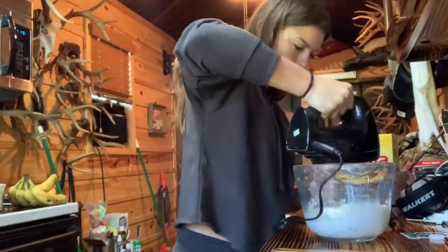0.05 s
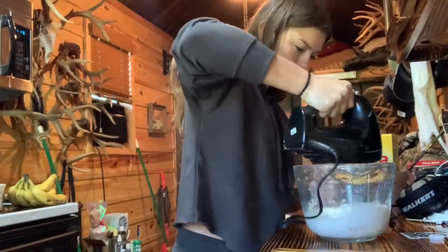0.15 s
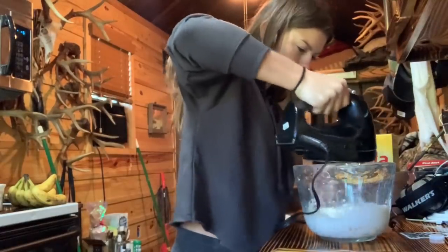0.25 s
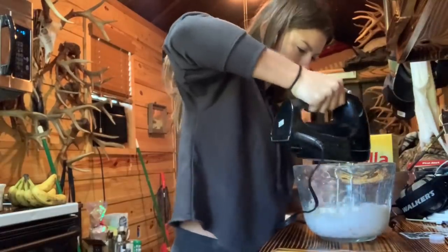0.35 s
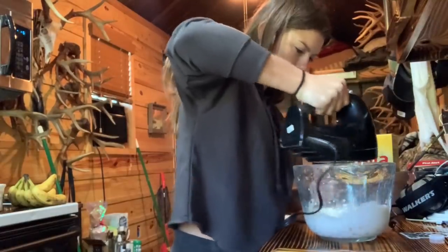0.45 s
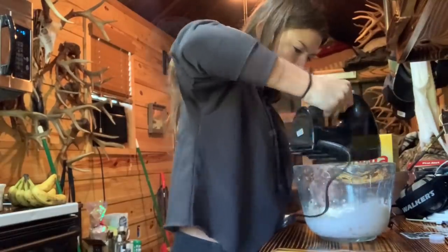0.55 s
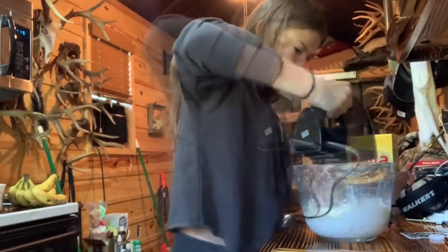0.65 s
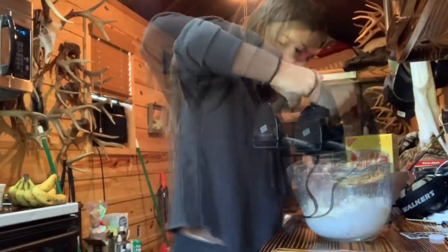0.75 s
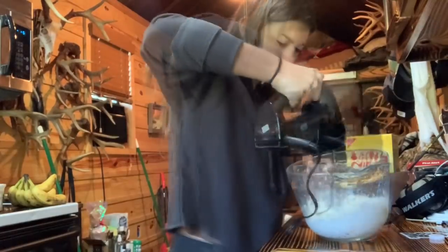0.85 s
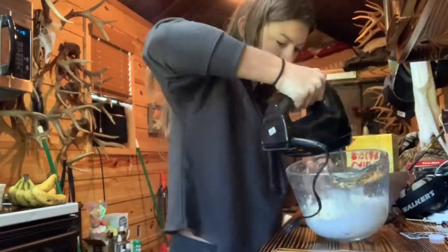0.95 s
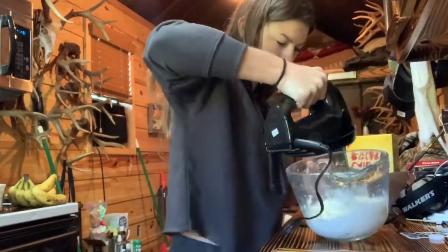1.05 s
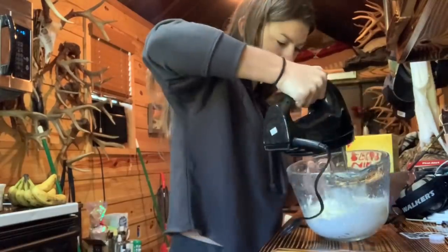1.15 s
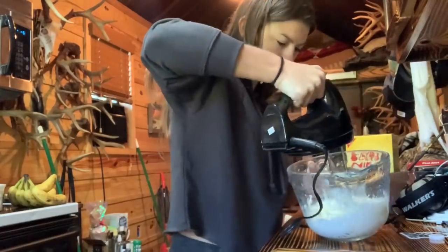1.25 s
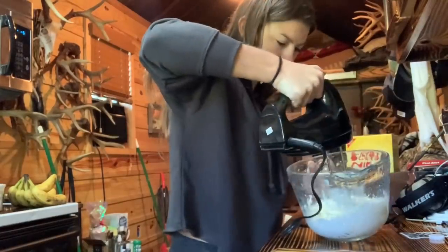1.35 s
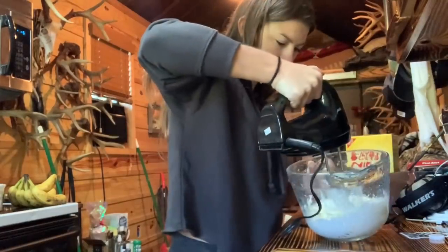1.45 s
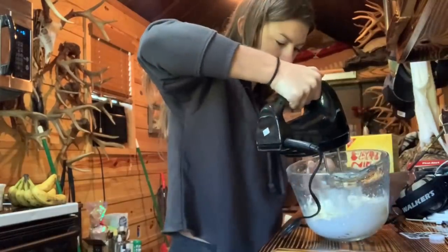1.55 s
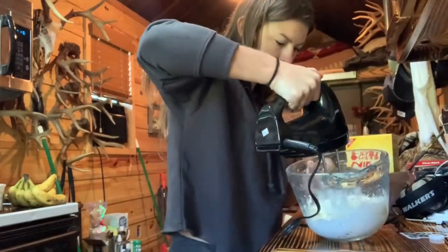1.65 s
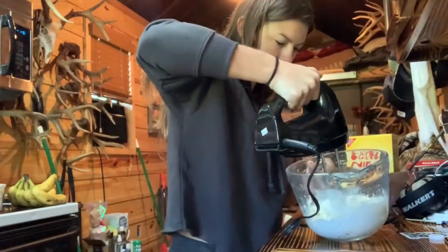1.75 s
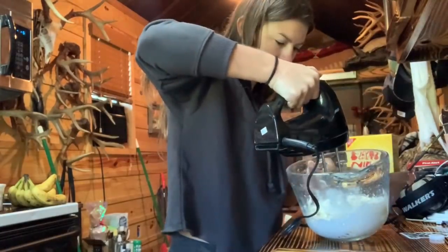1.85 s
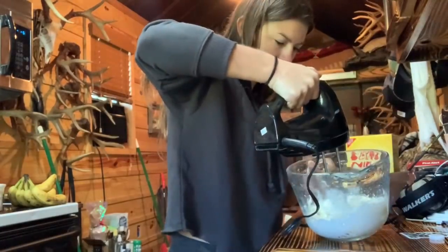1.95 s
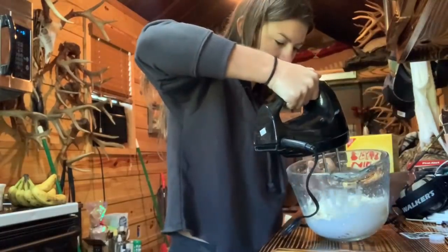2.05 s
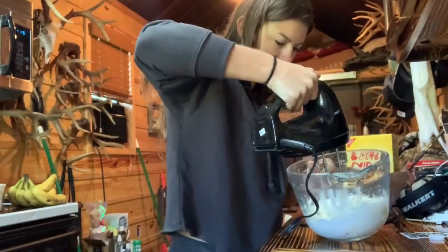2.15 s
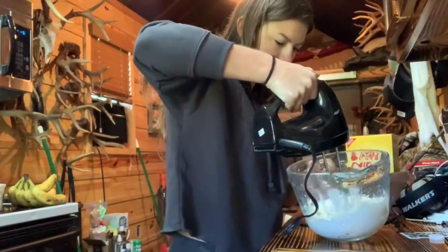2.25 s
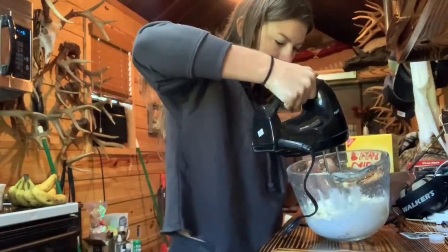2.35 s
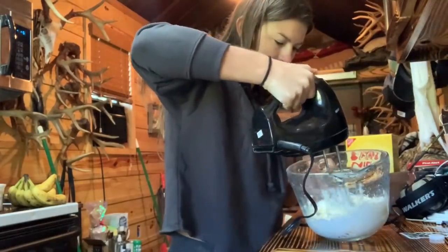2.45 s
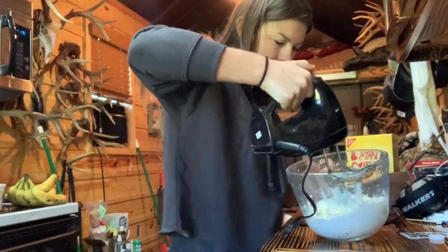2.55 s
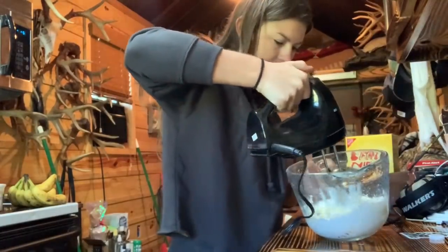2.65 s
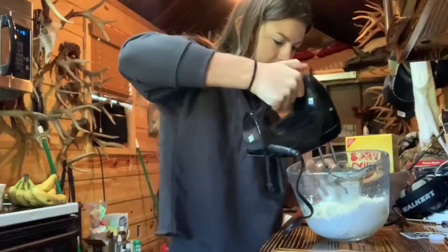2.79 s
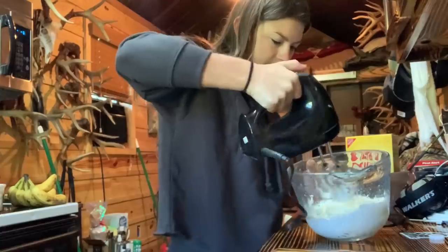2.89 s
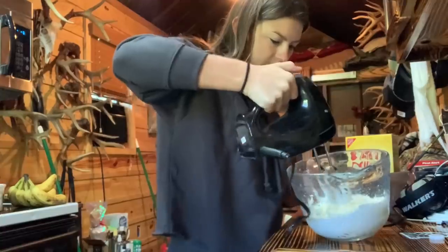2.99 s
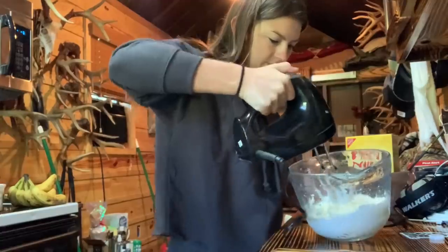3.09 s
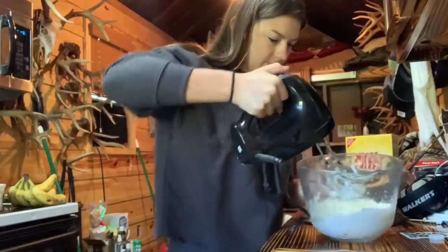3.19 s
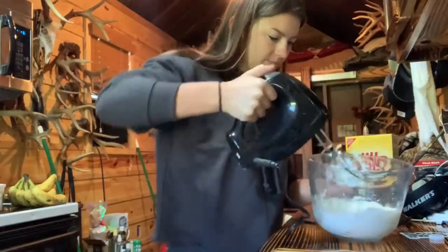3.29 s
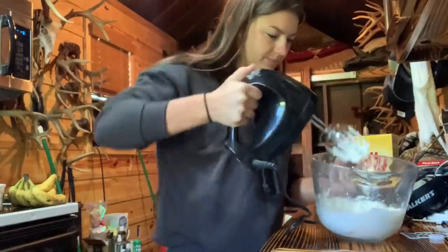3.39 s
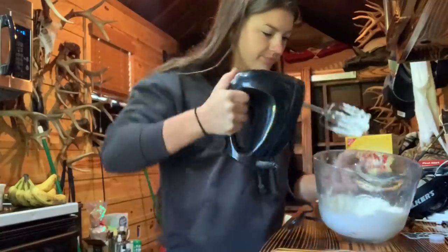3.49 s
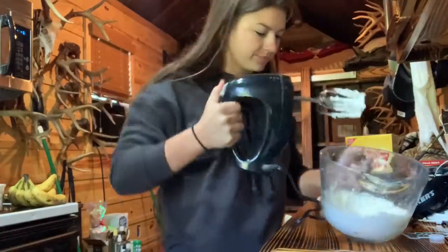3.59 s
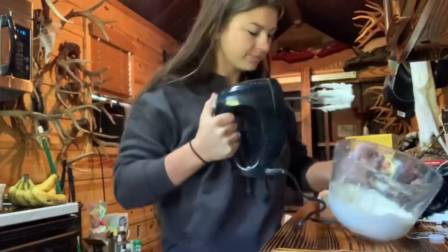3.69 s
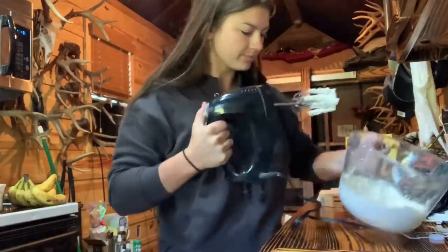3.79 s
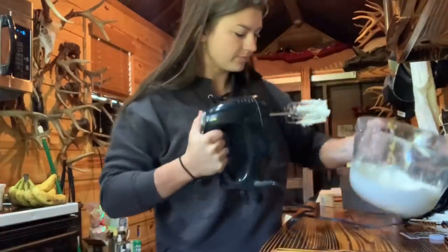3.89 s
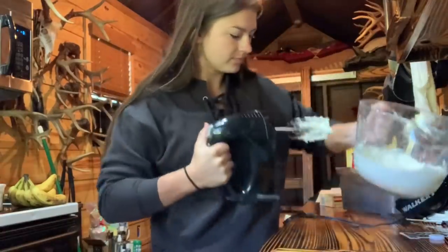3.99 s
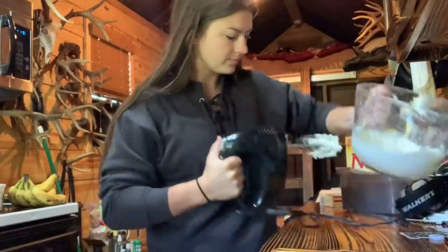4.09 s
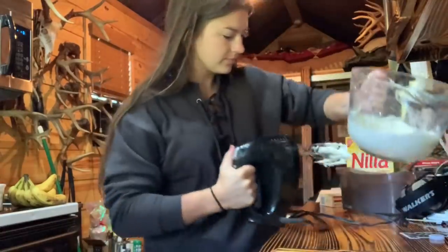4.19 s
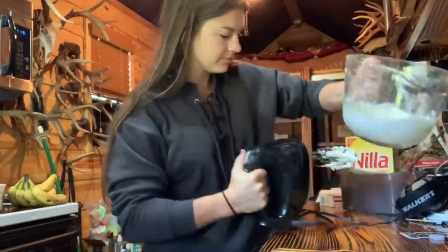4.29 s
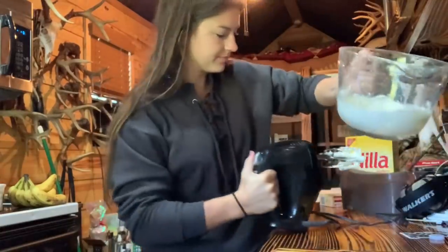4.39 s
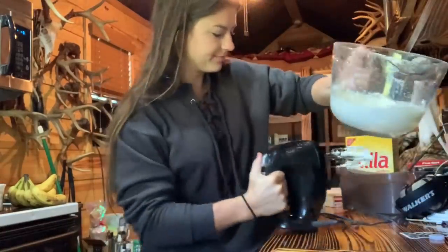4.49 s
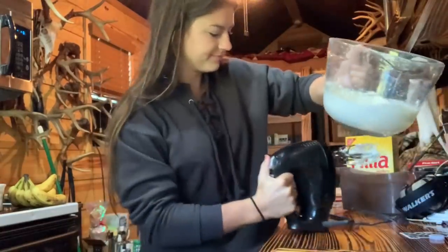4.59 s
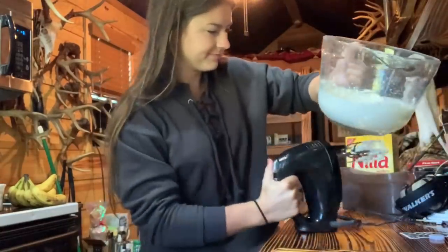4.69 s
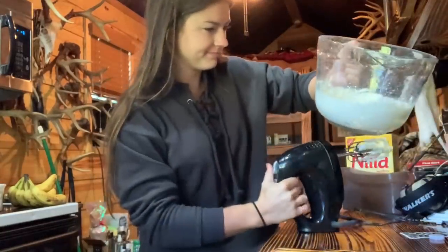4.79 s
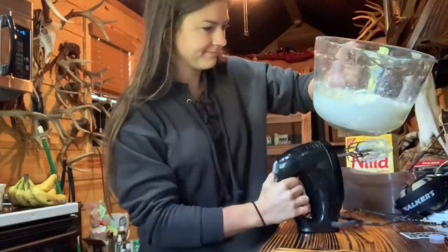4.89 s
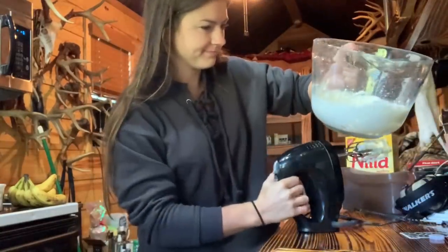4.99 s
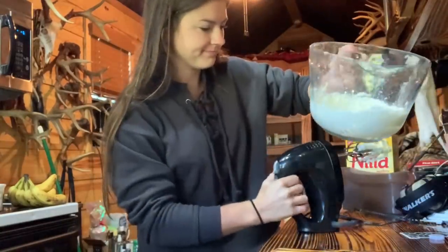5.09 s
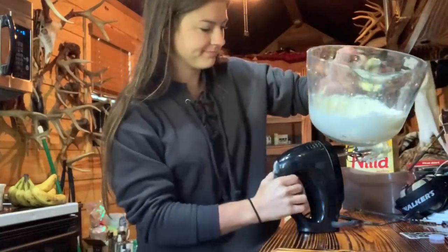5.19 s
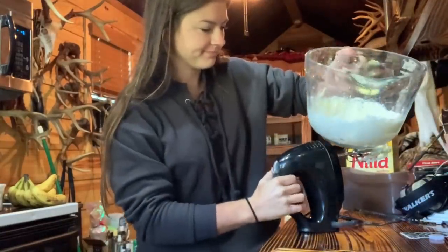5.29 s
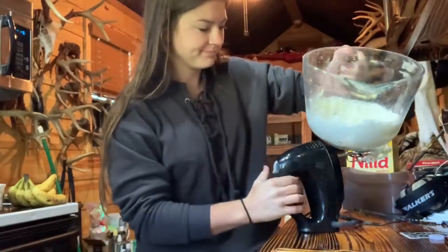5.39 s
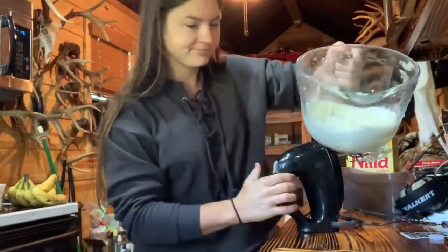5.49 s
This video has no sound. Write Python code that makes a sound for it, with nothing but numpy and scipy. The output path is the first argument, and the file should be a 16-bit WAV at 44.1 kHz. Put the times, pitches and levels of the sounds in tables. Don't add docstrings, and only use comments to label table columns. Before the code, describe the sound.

A close stereo pickup of an electric mixer: first a strained whine with airy fan roar, rattling beater knocks and thin high squeaks, then a smooth blend into a freer, higher-pitched run. The motor dips, cuts and coasts down in under a second. Over faint fridge hum in a quiet room, light clicks, sliding friction and low table thumps sound, strongest when things are set down.

```python
import sys
import numpy as np
from scipy import signal
from scipy.fft import rfft, irfft, next_fast_len
from scipy.io import wavfile
from scipy.ndimage import uniform_filter1d

SR = 44100
rng = np.random.default_rng(int(sys.argv[2]) if len(sys.argv) > 2 else 0)


def nominal_scale(level):
    x = np.asarray(level, float) / 20
    return 10 ** x


def generate_wav(signal):
    frames = np.transpose(np.atleast_2d(signal))
    scaled = np.clip(frames, -1, 1) * 32767
    pcm = np.round(scaled).astype(np.int16)
    wavfile.write(sys.argv[1], SR, pcm)


N = 244314

DISSOLVE_S = (0.54, 0.88)
OFF_S, STALL_S = 1.845, 2.559
# (pitch [Hz], width [Hz], level [dB])
BOWL = [(702, 37, -2.5), (1370, 69, 1.5), (1500, 71, -9), (2570, 59, -8)]


def evened(x):
    return x / np.sqrt(np.mean(x ** 2) + 1e-20)


def read(points, hz):
    f, value = np.transpose(points)
    return np.interp(np.log(hz + 1), np.log(f + 1), value)


def along(span):
    return np.interp(np.arange(N) / SR, span, [0, 1])


def stroke(start, length, rise_db, fall_db):
    t = np.arange(N) / SR - start
    return nominal_scale(np.minimum(0, np.minimum(rise_db * t, fall_db * (length - t))))


def wander(hz):
    return evened(signal.lfilter([1], [1, -np.exp(-2 * np.pi * hz / SR)], rng.standard_normal(N)))


def resonate(x, hz, width):
    r = np.exp(-np.pi * width / SR)
    return 2 * signal.lfilter([1 - r], [1, -r * np.exp(2j * np.pi * hz / SR)], x).real


def hollow(x, ring_db):
    return x + sum(nominal_scale(ring_db + db) * resonate(x, hz, width) for hz, width, db in BOWL)


def noise(colour, patchy_db, scale=1):
    # (pitch [Hz], left-right likeness [0-1])
    likeness = [(60, 0.92), (250, .93), (600, 0.81), (1500, 0.5), (4000, 0.43), (5500, 0.089), (6400, 0.26)]
    size, hop = 512 * scale, 128 * scale
    hz = np.fft.rfftfreq(size, 1 / SR)
    a, b, c, d, patches = rng.standard_normal((N // hop + 5, len(hz), 5)).T
    patches = uniform_filter1d(patches, size=5, axis=0)
    patches = evened(uniform_filter1d(patches, size=16, axis=1))
    same = np.clip(read(likeness, hz), 0, 1)[:, None]
    left = a + 1j * b
    right = same * left + np.sqrt(1 - same ** 2) * (c + 1j * d)
    z = np.array([left, right])
    z *= nominal_scale(read(colour, hz)[:, None] + patchy_db * patches)
    return evened(signal.istft(z, nperseg=size, noverlap=size - hop)[1][:, :N])


def line(angle, db, pan_db=0, lead=0):
    return nominal_scale(db) * nominal_scale([[pan_db / 2], [-pan_db / 2]]) * np.sin([angle + lead, angle])


def whine(rows, orders, beat_db, flutter_db, wet_db):
    # (pitch [Hz], half width [Hz], lift [dB])
    housing = [(980.5, 17, 8), (1448, 80, 7), (1827, 11, 12), (2150.3, 26, 9), (2199, 36, -15.5),
               (2380, 57, 6), (2480, 23, -2.5), (2506, 62, 2), (680, 130, -12), (4430, 840, -5.5),
               (2770, 29, -10), (6900, 110, 3), (7840, 170, 3), (11920, 190, 10), (15350, 250, 6.5)]
    mains_hz = 119
    s, shaft_hz, level_db = np.transpose(rows)
    t = np.arange(s[0], s[-1], 1 / SR)
    coarse = t[::256]
    turn = 2 * np.pi * np.cumsum(np.interp(t, s, shaft_hz)) / SR
    dry = line(12 * turn + 2 * np.pi * mains_hz * t, beat_db, -4, 1.5)
    for k, db, *ears in orders:
        hz = k * np.interp(coarse, s, shaft_hz)
        body_db = db + sum(lift_db / (1 + ((hz - f) / width) ** 2) for f, width, lift_db in housing)
        flutter = uniform_filter1d(rng.standard_normal(len(coarse)), size=9)
        flutter = evened(uniform_filter1d(flutter, size=9))
        tone_db = body_db + flutter_db * (1 + k / 40) * flutter
        dry += line(k * turn, np.interp(t, coarse, tone_db), *ears)
    soft_ends = signal.windows.tukey(len(t), 400 / len(t))
    dry *= np.sqrt(2) * nominal_scale(np.interp(t, s, level_db)) * soft_ends
    tail = rng.standard_normal((2, 9000)) * nominal_scale(-60 * np.arange(9000) / SR / 0.28)
    wet = nominal_scale(wet_db) * signal.oaconvolve(dry, tail / np.linalg.norm(tail[0]), axes=1)
    wet[:, :len(t)] += dry
    out = np.zeros((2, N))
    out[:, round(s[0] * SR):][:, :wet.shape[1]] = wet
    return out


def table(force):
    # (pitch [Hz], level [dB], time to fall 60 dB [s])
    modes = [(95.4, -2, 0.32), (127.6, -1, 0.058), (179, -3.5, 0.099), (252, 0.5, 0.036),
             (326.5, 0.5, 0.049), (458, -2, 0.052), (514, -5.5, 0.13), (749, -20, 0.02), (1060, -17, .1)]
    t = np.arange(12000) / SR
    rings = np.array([nominal_scale(db - 60 * t / t60) * np.sin(2 * np.pi * hz * t) for hz, db, t60 in modes])
    shares = rng.uniform(0.66, 1.35, (len(modes), 1))
    return signal.oaconvolve(force[None], [rings.sum(0), (shares * rings).sum(0)], axes=1)[:, :N]


def kitchen():
    # (pitch [Hz], level per Hz [dB])
    floor = [(15, -35.5), (25, -15), (69, 1), (202, -15.5), (271, -2.5), (318, -13), (833, -30),
             (8320, -45.5), (9520, -45), (11500, -44), (15000, -55)]
    # (pitch [Hz], width [Hz], level [dB])
    fridge = [(64.2, 6.4, -59), (122.9, 13, -86), (146, 20, -74), (275.2, 16, -68), (534, 10, -90.5)]
    hum = 0
    for hz, width, db in fridge:
        blurred = resonate(resonate(rng.standard_normal(N), hz, width), hz, width)
        hum = hum + nominal_scale(db) * evened(blurred)
    return nominal_scale(-62.5) * noise(floor, patchy_db=4.5, scale=4) + nominal_scale([[2.5], [-2.5]]) * hum


def loaded_motor():
    # (time [s], shaft speed [Hz], level [dB])
    speed = [(0, 177, -42), (.12, 177.2, -36.5), (.26, 180.6, -40), (.4, 183.5, -41), (.52, 181.4, -38),
             (.58, 178.4, -42.5), (.7, 178.6, -44), (.9, 174, -61)]
    # (multiple of shaft speed, level [dB], left-right [dB], left lead [rad])
    orders = [(1, -4, 0, -.2), (3, 1, 0, -.2), (10, -13, -10, -1.8), (12, 0, 0, .8), (24, -6, 0, -.5),
              (36, -10, 4, 1.1), (47, -16), (48, -13), (60, -10), (62, -18), (64, -17), (68, -14),
              (72, -17), (84, -16)]
    return whine(speed, orders, beat_db=-10, flutter_db=1.5, wet_db=-11.5)


def roar():
    # (loaded [dB], free [dB], sagged [dB], fall half a second after switch-off [dB], bend)
    levels = [
        (-31, -29.5, -30, 22, 1.17),
        (-35, -30.5, -33, 14.5, 0.67),
        (-34.5, -34, -35.5, 8.5, 3.3),
        (-30, -32, -31.5, 24.5, 2),
    ]
    # (pitch [Hz], level per Hz [dB])
    colour = [(60, -45), (150, -8), (400, -5), (1000, 0.5), (1600, -1), (2600, -3.5), (4000, -9.5),
              (6000, -10), (9000, -9.5), (12000, -13), (15500, -11)]
    air = noise(colour, patchy_db=1.5)
    below = []
    for hz in (1900, 4800, 9300):
        below.append(signal.sosfiltfilt(signal.butter(2, hz, fs=SR, output="sos"), air))
    parts = [below[0], below[1] - below[0], below[2] - below[1], air - below[2]]
    freed = along(DISSOLVE_S)
    sagged = along((1.8, 1.55))
    after = np.maximum(np.arange(N) / SR - OFF_S, 0)
    out = np.zeros((2, N))
    for part, (loaded_db, free_db, sagged_db, fall_db, bend) in zip(parts, levels):
        running_db = free_db + (sagged_db - free_db) * sagged
        running_db = running_db - fall_db * (2 * np.minimum(after, 1)) ** bend
        out += part * np.hypot((1 - freed) * nominal_scale(loaded_db), freed * nominal_scale(running_db))
    return out * stroke(-0.993, STALL_S + 1, 1, 195)


def drumming():
    # (start [s], length [s], level [dB])
    bouts = [
        (0.108, 0.14, -31),
        (0.318, .23, -30),
        (0.582, 0.081, -37.5),
        (0.697, 0.024, -33),
        (.78, .14, -33),
    ]
    happens = rng.random(N) < 150 / SR
    blows = nominal_scale(1.0 * rng.exponential(1, N)) * rng.choice([-1., 1.], N) * happens
    ring = table(signal.oaconvolve(blows, np.hanning(50))[:N])
    steady = ring / np.sqrt(uniform_filter1d(ring[0] ** 2, size=5000) + 1e-12)
    level = nominal_scale(-47)
    for s, length, db in bouts:
        level = level + nominal_scale(db) * stroke(s, length, 350, 403)
    freer = 1 - along(DISSOLVE_S) * 0.73
    return nominal_scale(1.5) * freer * level * stroke(-1.3, 2, 1, 150) * steady


def squeaks():
    # (start [s], length [s], pitch [Hz], level [dB])
    whistles = [
        (0.512, 0.068, 5660, -44),
        (.665, 0.017, 5720, -45.5),
        (0.728, 0.057, 5650, -43.5),
        (3.577, 0.029, 5730, -80),
        (4.25, 0.028, 7000, -81),
        (4.677, 0.008, 3070, -59),
        (4.748, .03, 3100, -74.5),
    ]
    hiss = rng.standard_normal((2, N))
    out = 0
    for s, length, hz, db in whistles:
        whistle = evened(resonate(resonate(hiss, hz, 250), hz, 250))
        out = out + nominal_scale(db) * stroke(s, length, 1500, 700) * whistle
    return out


def free_motor():
    # (time [s], shaft speed [Hz], level [dB])
    speed = [(.52, 211.8, -50.5), (.8, 212.8, -39.5), (1.1, 213.3, -35.5), (1.465, 213.9, -37),
             (1.54, 204.8, -39.5), (1.64, 201.7, -46), (1.73, 196, -38.5), (1.845, 193.6, -41)]
    # (multiple of shaft speed, level [dB], left-right [dB], left lead [rad])
    orders = [(1, -6, -3, -.5), (4, -8, -3, -1.1), (5, -12, 3, -2.7), (10, -3, -1, .2), (12, 5, -1, -.1),
              (13, -9, -2, -.3), (24, -10, 1, .9), (25, -16, -4, -3), (32, -10), (36, -8), (38, -15),
              (39, -15), (48, -14), (59, -14), (60, -14), (63, -16), (71, -17)]
    return whine(speed, orders, beat_db=-7, flutter_db=0.7, wet_db=-20)


def coasting_motor():
    # (multiple of shaft speed, level [dB], left-right [dB], left lead [rad])
    orders = [(1, -9), (5, -7), (10, -2), (11, -3, -2, -3), (12, 2, -3, -3.3), (13, -3, -2, -3), (23, -8),
              (24, -4, 0, .8), (25, -8), (35, -8), (36, -2, 0, 1.5), (37, -8), (47, -7), (48, -1, 0, 1.5),
              (49, -8), (60, -6), (72, -6)]
    t = np.linspace(0, STALL_S - OFF_S, num=40)
    slowed = (t / 0.385) ** 1.05
    shaft_hz = 192.5 * np.exp(-slowed)
    level_db = -48 - 10 * slowed ** 1.2 - 14 * (t / t[-1]) ** 8
    speed = np.transpose([OFF_S + t, shaft_hz, level_db])
    return whine(speed, orders, beat_db=-80, flutter_db=2.5, wet_db=-2)


def ticks():
    # (time [s], peak level [dB], treble slope above the knee [dB per octave], left-right [dB])
    cracks = [(2.807, -37, -16, 9), (2.898, -40.5, -22, 7), (3.021, -53, -29, 9), (3.152, -56, -31, 4),
              (3.169, -36, -15, 5), (3.198, -44.5, -19, 4), (3.33, -46, -40, 5), (3.57, -50.5, -32, 5),
              (3.651, -37, -14.5, 3.5), (3.792, -36.5, -14.5, 7), (3.799, -39, -29, 8),
              (4.027, -36.5, -8, 3.5), (4.138, -30, -7, 3), (4.302, -29, -4, 8), (4.401, -26.5, -14.5, 2.5),
              (4.424, -27, -10.5, 6), (4.631, -44.5, -1.5, 6), (4.677, -45.5, 7, 15), (4.705, -56, -14, 9)]
    # (pitch [Hz], time to fall 60 dB [s])
    room_ring = [(300, 0.57), (1000, 0.21), (3000, 0.23), (8000, 0.22), (15000, 0.15)]
    knee_hz = 1760
    out, hz = np.zeros((2, N)), np.fft.rfftfreq(256, 1 / SR)
    for s, db, fall_db, pan_db in cracks:
        a, b = rng.standard_normal((2, 7000))
        _, t, z = signal.stft([a, .5 * a + 0.94 * b], SR, nperseg=256)
        colour_db = np.maximum(fall_db * np.log2(1 + (hz / knee_hz) ** 4) / 4, -38)
        colour_db -= 3 * np.log2(1 + hz / 1000)
        colour_db -= 7 * np.maximum(np.log2(600 / (hz + 20)), 0)
        fading_db = colour_db[:, None] - 60 * t / read(room_ring, hz)[:, None]
        tail = signal.istft(z * nominal_scale(fading_db), SR, nperseg=256)[1]
        t = np.arange(tail.shape[1]) / SR
        shape = np.minimum(t / 0.0034, 1) * (1 + 1.15 * np.exp(-t / 0.0038)) / (1 + (t / 0.089) ** 6)
        ears = nominal_scale([[db - 18.5 + pan_db / 2], [db - 13.5 - pan_db / 2]])
        tick = tail * shape / np.sqrt(np.mean(tail[:, :400] ** 2)) * ears
        part = out[:, round(s * SR):][:, :tick.shape[1]]
        part += tick[:, :part.shape[1]]
    return hollow(out, ring_db=-0.5)


def sliding():
    # (start [s], length [s], scuff level [dB], weight on the table [dB], treble [dB])
    slides = [
        (2.861, 0.047, -65.5, 1, -15),
        (3.118, 0.15, -78, 29.5, -21),
        (3.302, 0.15, -78, 28.5, -20),
        (3.834, 0.16, -58.5, -1.5, -18.5),
        (4.137, 0.12, -64.5, 2, -10),
        (4.439, .27, -56.5, 17, -1.5),
        (5.458, .12, -74.5, -3.5, 1),
    ]
    # (pitch [Hz], level per Hz [dB])
    rumble = [(40, -11), (70, 5), (100, -1.5), (180, -1), (300, -13), (500, -19.5), (1000, -57.5)]
    scuff = [(200, -24), (450, 1), (800, 4), (1500, -3), (2800, -14), (4000, -26), (8000, -58.5)]
    fizz = [(1500, -45.5), (3200, -1.5), (7000, -1), (11000, -8.5), (15500, -12)]
    strokes = np.array([nominal_scale(db) * stroke(s, length, 218, 245) for s, length, db, *_ in slides])
    weight, treble = nominal_scale(np.transpose(slides)[3:]) @ strokes
    grain = nominal_scale(2.0 * uniform_filter1d(wander(30), size=100))
    on_table = weight * noise(rumble, patchy_db=4.5, scale=4)
    on_bowl = nominal_scale(2.5) * strokes.sum(0) * grain * hollow(noise(scuff, patchy_db=1.5), ring_db=0)
    on_plastic = (nominal_scale(-8.5) * treble + nominal_scale(-98.5)) * grain * noise(fizz, patchy_db=1.5)
    return on_table + on_bowl + on_plastic


def thuds():
    # (time [s], peak level [dB], hardness [0-1], own thump [Hz])
    landings = [(3.159, -35, 0.7, 117), (3.172, -27.5, 0.3, 180), (3.186, -34, 0.87, 104),
                (3.205, -34.5, 0.97, 534), (3.211, -25, 0.67, 106), (3.235, -33.5, 0.85, 83.4),
                (3.57, -29.5, 0.59, 121), (4.304, -29, 0.56, 217), (4.313, -23, 0.5, 116),
                (4.325, -22.5, 0.75, 89.5), (4.402, -21.5, 0.54, 172), (4.414, -24, 0.63, 109),
                (4.425, -17.5, 0.77, 88), (4.445, -23.5, 0.68, 91), (4.463, -24.5, 0.64, 92),
                (4.65, -29.5, 0.6, 117), (4.681, -28.5, 0.64, 123), (4.695, -23.5, 0.13, 167)]
    force, thumps, t = np.zeros(N), np.zeros(N), np.arange(2600) / SR
    swell = t / 0.011 * np.exp(1 - t / 0.0077)
    for s, db, hardness, hz in landings:
        start = round(s * SR)
        thump_db = db - 2.8 * np.log2(hz / 120)
        thumps[start:][:len(t)] += nominal_scale(thump_db) * swell * np.sin(2 * np.pi * hz * t)
        push_s = 0.0048 * (1.15 - np.clip(hardness, 0, 1))
        push = np.sin(np.pi * np.minimum(np.arange(400) / (SR * push_s), 1))
        force[start:][:400] += nominal_scale(db) * push / push.sum()
    return nominal_scale(-6) * table(force) + nominal_scale(-2.0) * thumps


def scene():
    motor = loaded_motor() + free_motor() + coasting_motor()
    beating = motor + roar() + drumming() + squeaks()
    return kitchen() + beating + ticks() + sliding() + thuds()


def band_limit(x):
    return signal.sosfilt(signal.butter(12, 16920, fs=SR, output="sos"), x)


def record(dry):
    # (pitch [Hz], left-right [dB])
    lean = [(60, -3), (700, -4), (1300, -2.5), (2400, -3.5), (4400, -1.5), (8000, 0)]
    bass_cut_hz, mono_hz, edge_hz = 68.4, 6600, 15750
    right_lag = 11.73
    size = next_fast_len(N + 64)
    hz, z = np.fft.rfftfreq(size, 1 / SR), rfft(dry, size)
    z *= nominal_scale(np.outer([.5, -.5], read(lean, hz)))
    z *= (1j * hz / bass_cut_hz / (1 + 1j * hz / bass_cut_hz)) ** 3
    shared = np.clip((hz - mono_hz) / 600, 0, 1)
    z[1] += shared * (z[0] - z[1])
    z[1] *= np.exp(-2j * np.pi * hz * right_lag / SR)
    z *= np.clip((edge_hz - hz) / 100 + .5, 0, 1)
    return band_limit(irfft(z, size)[:, :N])


dry = scene()
out = record(dry)
generate_wav(out)
```